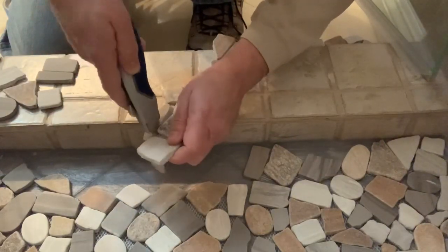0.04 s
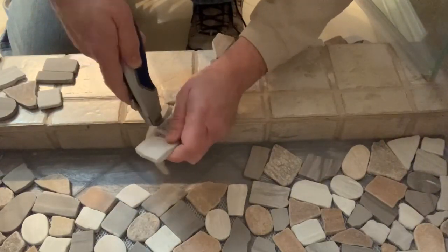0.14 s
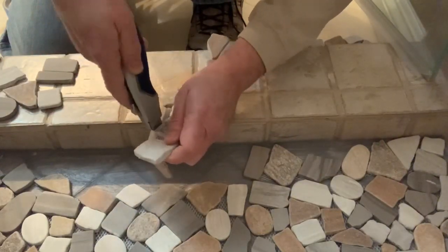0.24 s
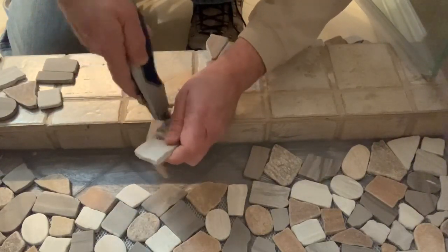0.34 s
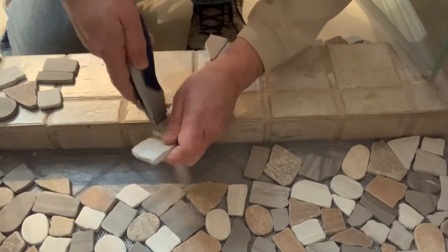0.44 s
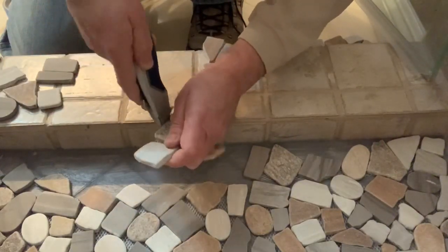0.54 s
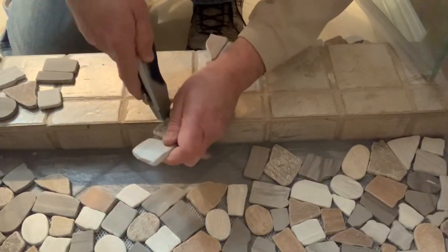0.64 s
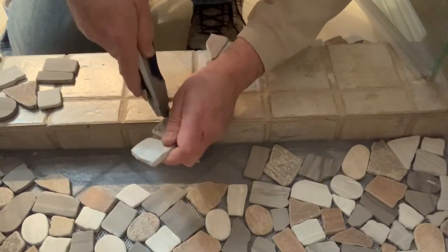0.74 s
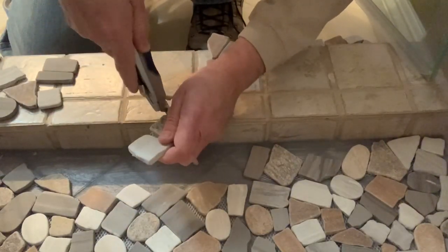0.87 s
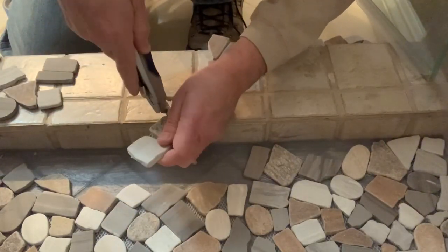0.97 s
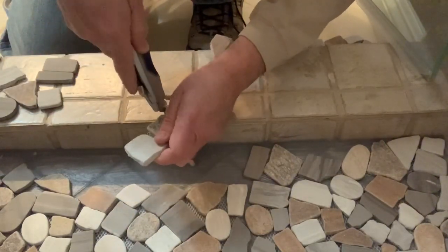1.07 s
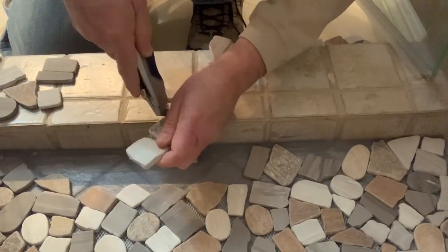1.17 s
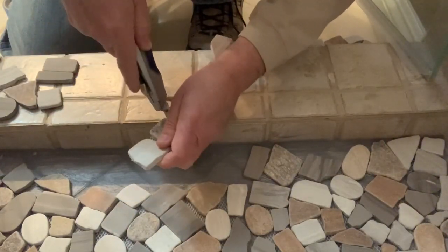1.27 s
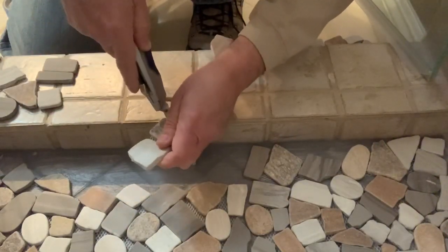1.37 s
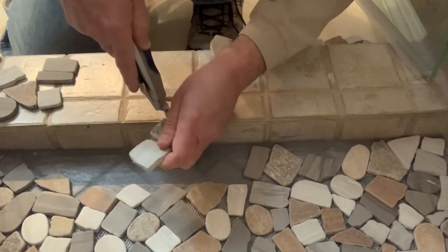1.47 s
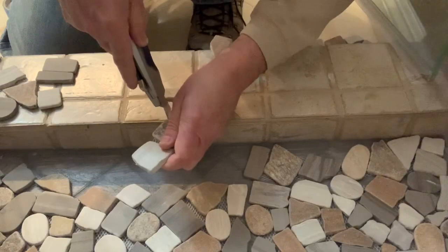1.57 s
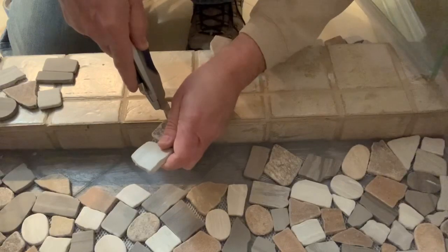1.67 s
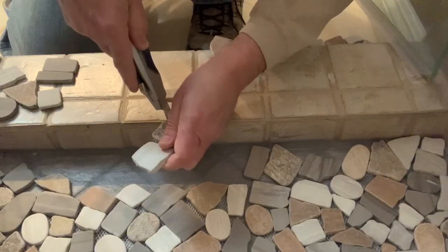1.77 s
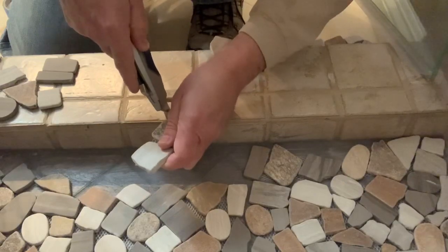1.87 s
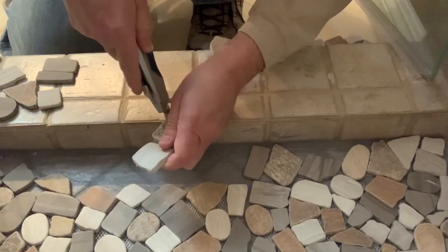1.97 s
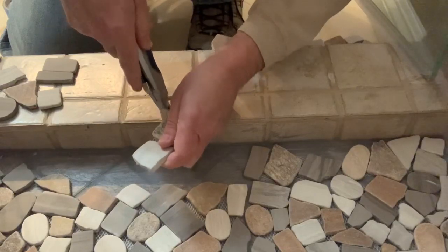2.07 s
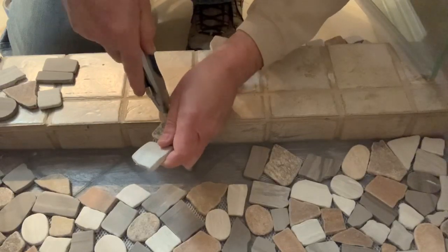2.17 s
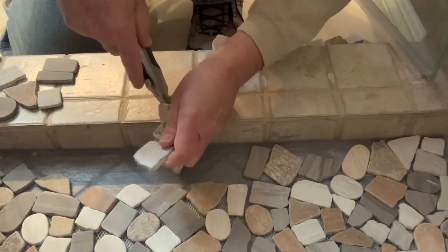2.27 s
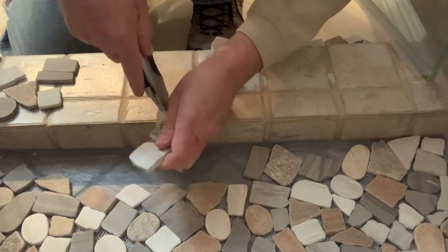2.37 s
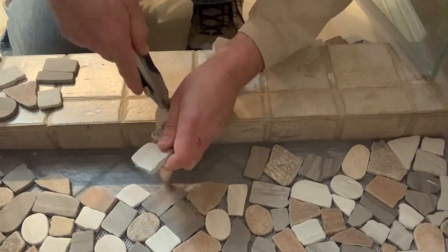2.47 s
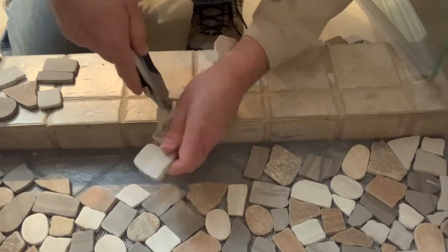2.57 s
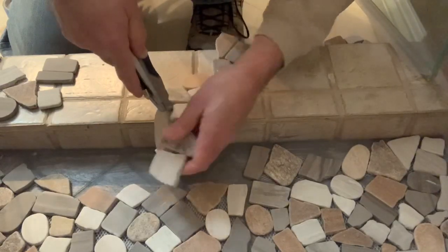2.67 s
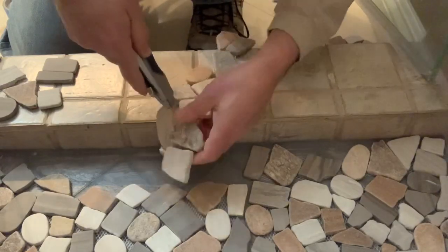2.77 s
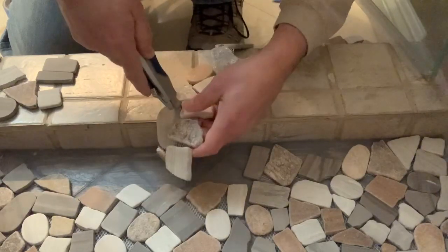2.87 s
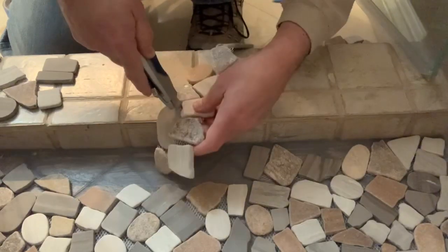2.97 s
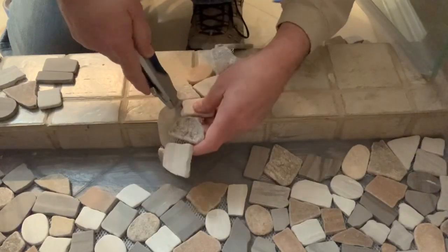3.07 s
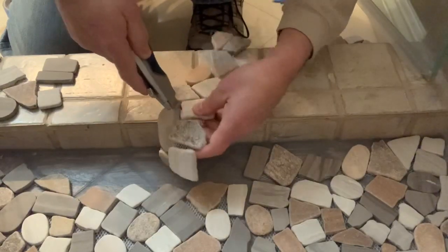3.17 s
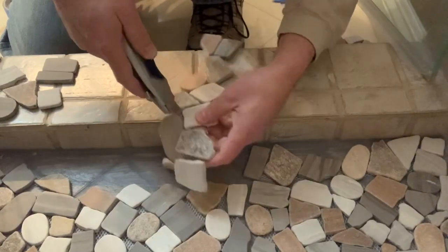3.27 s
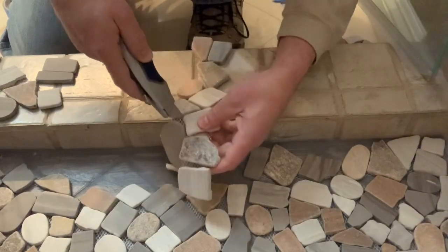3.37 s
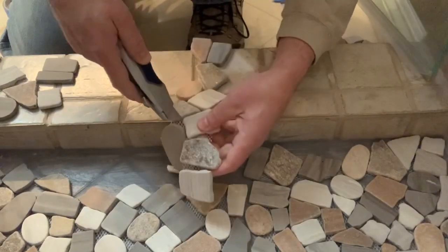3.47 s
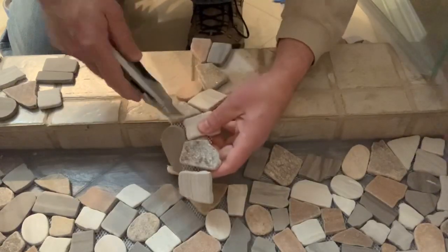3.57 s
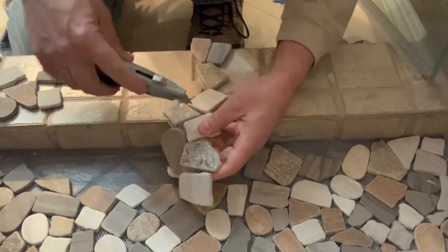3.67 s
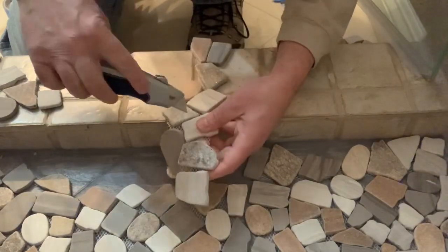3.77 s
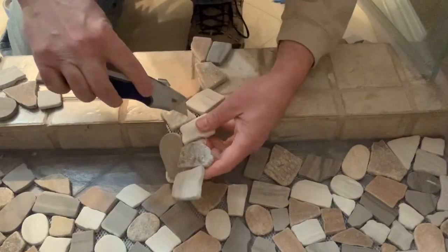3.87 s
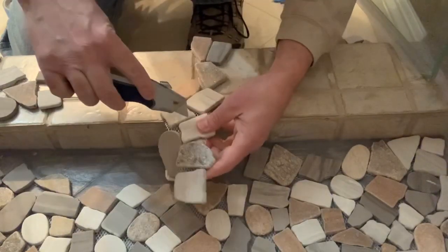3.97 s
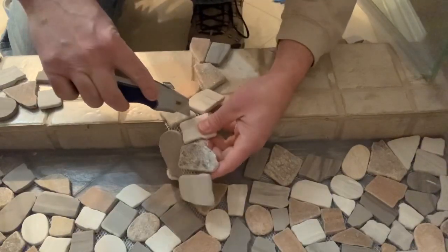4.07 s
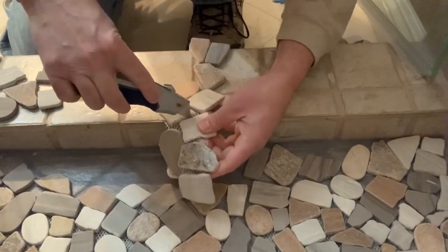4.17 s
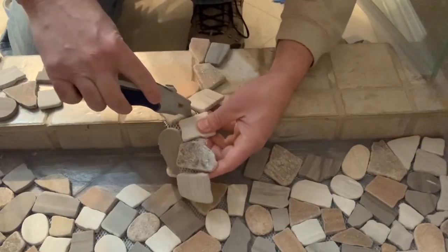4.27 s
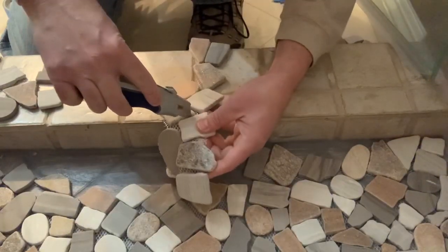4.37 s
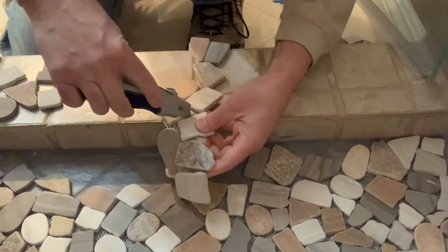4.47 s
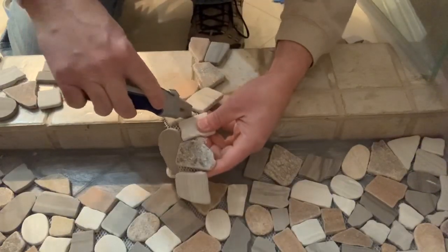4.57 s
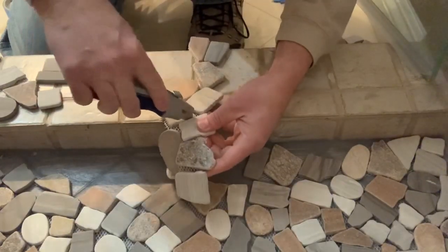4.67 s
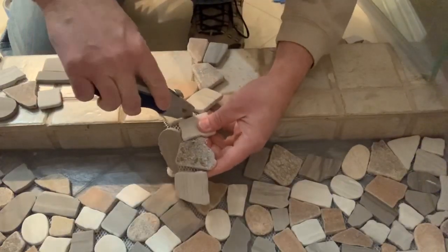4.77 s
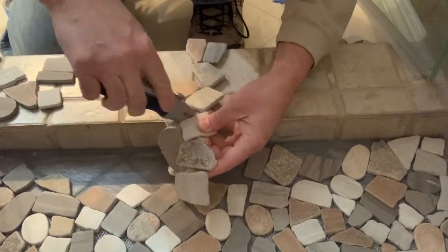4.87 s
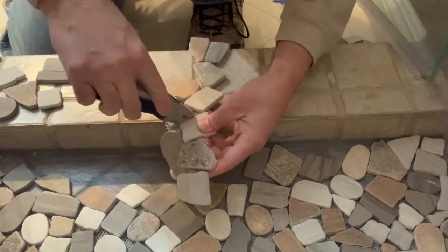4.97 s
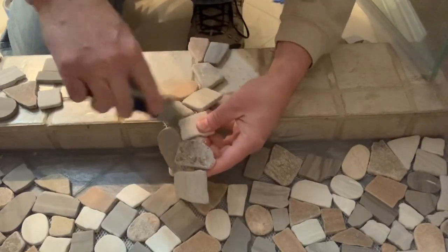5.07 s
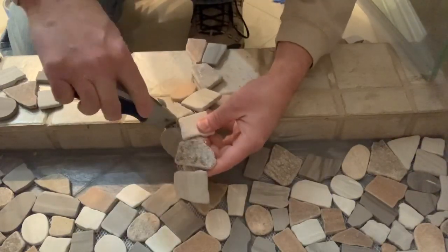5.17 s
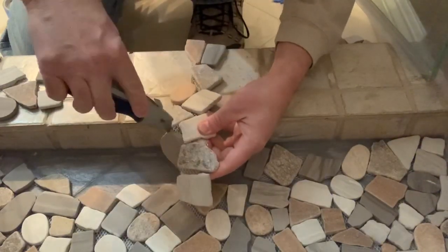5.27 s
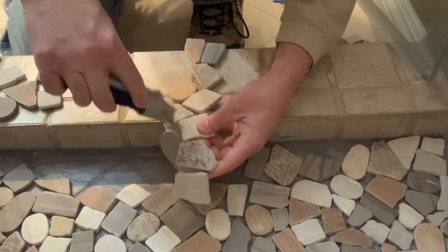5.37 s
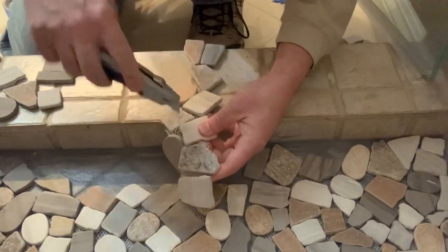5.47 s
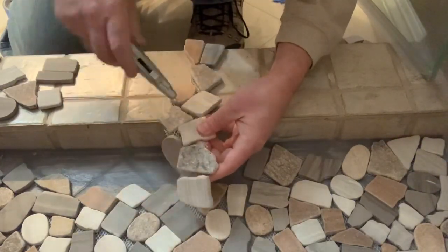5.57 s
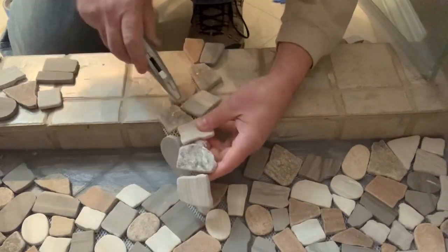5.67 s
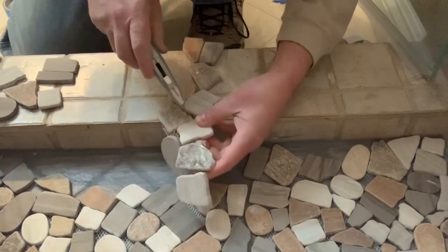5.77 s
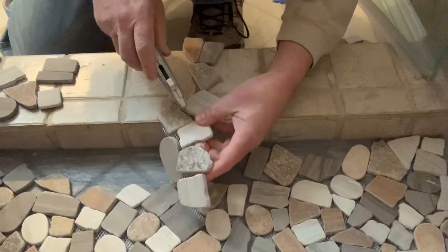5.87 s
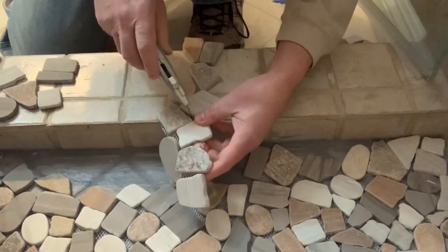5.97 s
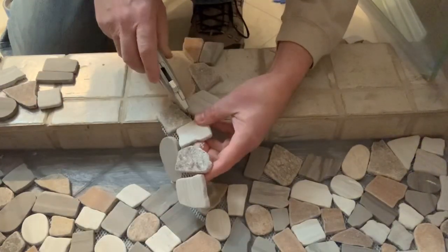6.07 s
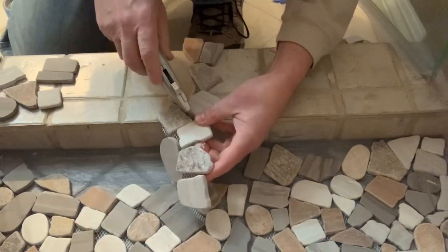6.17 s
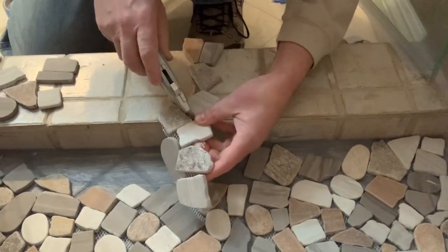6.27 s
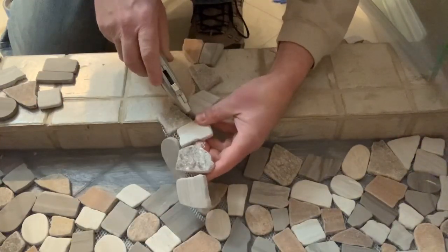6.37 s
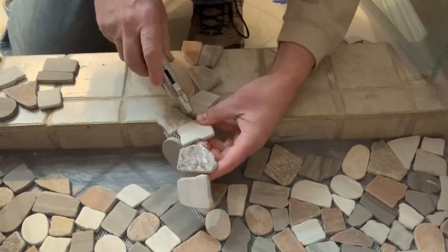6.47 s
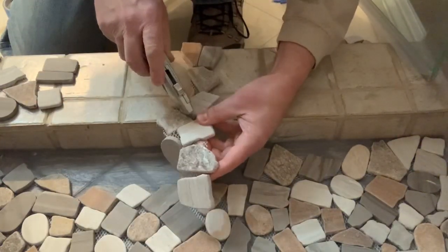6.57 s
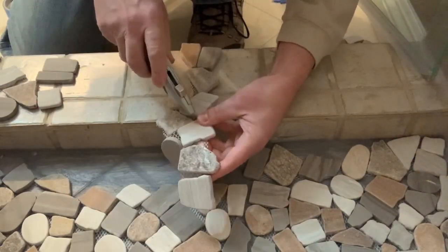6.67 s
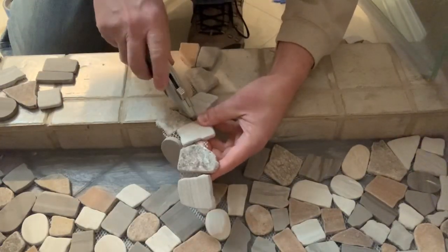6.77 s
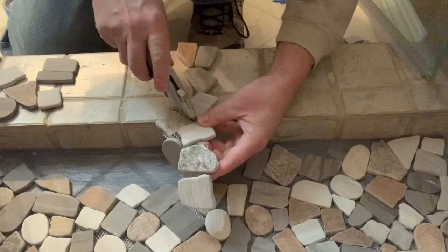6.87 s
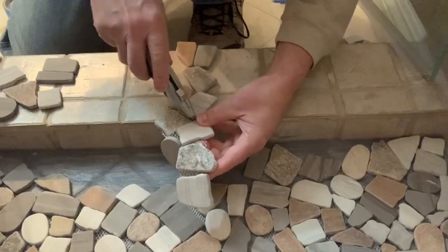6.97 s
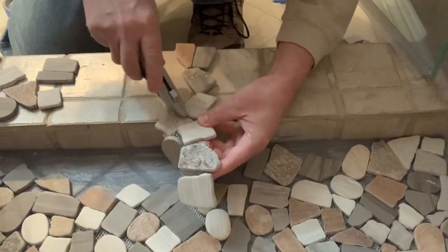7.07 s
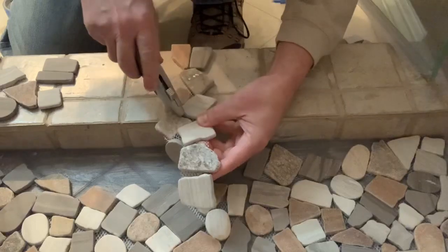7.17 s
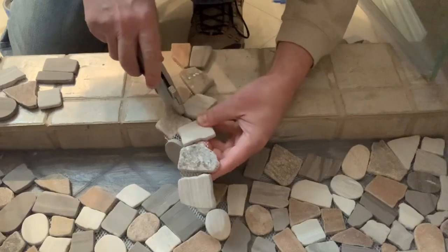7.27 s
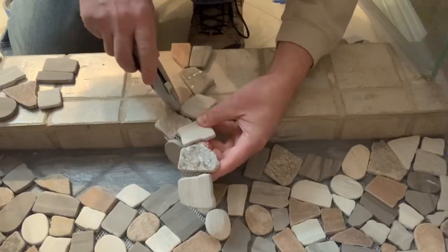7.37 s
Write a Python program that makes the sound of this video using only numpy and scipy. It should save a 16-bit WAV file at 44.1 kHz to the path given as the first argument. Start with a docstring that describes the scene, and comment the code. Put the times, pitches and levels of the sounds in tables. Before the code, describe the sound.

Sharp, irregular snaps and light stone clinks come as a sheet of small tiles is cut apart in an echoing bathroom.

```python
"""Cutting stone tiles in a bathroom

A hand blade snaps the mesh and glue between small stone tiles. Each snap is a short burst of
tiny cracks that makes a stone ring. Loose stones clink and rub, a sleeve rustles, and the sheet
of tiles thuds on a ledge. The hard, tiled room rings on, and the house drones low underneath."""
import sys
import numpy as np
from scipy import signal
from scipy.fft import rfft, irfft, next_fast_len
from scipy.io import wavfile
from scipy.ndimage import uniform_filter1d

SR = 44100
rng = np.random.default_rng(int(sys.argv[2]) if len(sys.argv) > 2 else 0)


def unload_audio(sound):
    """Save the sound as a 16-bit wav file, at the path given as the first command line argument."""
    columns = np.transpose(np.atleast_2d(sound))
    # keep every value between -1 and 1, then stretch to whole-number steps
    steps = np.round(np.clip(columns, -1, 1) * 32767)
    wavfile.write(sys.argv[1], SR, steps.astype(np.int16))


N = 327663

# Room resonances that hold the house's drone. Each row: pitch in Hz, width in Hz, level in dB.
DRONE_NOTES = [(66, 8.4, -61), (97.85, 7.6, -62)]
# The tone of the faint air noise. Each row: frequency in Hz, level in dB.
AIR_TONE = [(76, -30), (130, -3.5), (183, -4.5), (554, -19), (1140, -18.5), (11800, -28), (16000, -44)]
# Mesh and glue snapping. Each row: time in seconds, level in dB, the stone's pitch in Hz,
# treble in dB, body (the lower tones) in dB, build-up in milliseconds.
SNAPS = [(0.0076, -24, 3904, -5, -8, 5.2), (0.0238, -22.5, 4650, -4, 8.5, 8.4),
         (0.0573, -22, 2870, -6, -8, 11), (0.205, -37, 3170, -5, 14, 2.8),
         (0.2766, -25.5, 4320, 2, -8, 1.5), (0.291, -20, 4530, -2, 7, 3), (0.3018, -13.5, 4700, -4, 0, 2.5),
         (0.309, -13, 4510, -2.5, 0.5, 3.9), (0.3632, -30.5, 3030, 5.5, -0.5, 1.5),
         (0.372, -18.5, 11900, 2.5, 0, 1.2), (0.405, -19.5, 1100, -28.5, 17.5, 1.5),
         (0.476, -11.5, 1094, 1, 4.5, 1.6), (0.51, -24, 3910, -1, -5.5, 18),
         (0.5293, -22.5, 3770, -1, -20.5, 13), (0.643, -33.5, 4230, -1.5, -8, 5.4),
         (0.771, -44.5, 4410, -6, -2, 10.4), (1.049, -34.5, 930, 2.5, 10, 2),
         (1.0637, -31, 2470, -18, -5.5, 4.6), (1.166, -40, 2360, -9, -7, 19),
         (1.19, -38.5, 3860, 2, 2, 2.2), (1.4796, -31.5, 2310, -4, 11, 6.8),
         (1.603, -23.5, 3680, -3, 3, 0.16), (1.745, -45, 3700, 1.5, 24.5, 5.9),
         (1.8355, -40, 4150, -20, 4, 6.5), (1.9559, -26.5, 4400, -4, -7, 6.6),
         (1.9914, -28.5, 4980, -9.5, 3, 13.5), (2.0905, -37, 1370, 12.5, 42.5, 2.4),
         (2.153, -28, 3170, -3.5, 4, 3.5), (2.1896, -20, 5400, -1, -4, 16),
         (2.2751, -25.5, 2170, -3.5, 7, 2.2), (2.2876, -26, 2940, -2, 11.5, 1.1),
         (2.339, -29, 3060, -8.5, 16.5, 3.4), (2.5208, -34.5, 1780, -13, 14, 0.85),
         (2.564, -35, 4150, 5, 13, 1.9), (2.5955, -23.5, 5260, 1.5, 6.5, 3.2),
         (2.693, -34.5, 1050, -8, 9, 3.7), (2.738, -29, 2100, -13, 7.5, 2.7),
         (2.8723, -45.5, 2310, -2, 17, 1), (3.0255, -48.5, 2140, -5, 16, 3.7),
         (3.051, -30, 4780, -2, 12, 1.9), (3.269, -52, 1130, -4, 37, 7.5),
         (3.801, -55.5, 1340, -20, 53, 2.1), (4.0752, -43, 1445, -5.5, 2.5, 2.4),
         (4.1408, -41.5, 2270, -5.5, 1, 8.8), (4.2189, -27, 1300, -2, 1.5, 1.3),
         (4.5685, -38.5, 2230, -3, 9, 3.7), (4.813, -24, 4670, -3, 11, 1.03),
         (4.8225, -14.5, 2900, -11, -1.5, 2), (4.8259, -4, 3520, 1.5, 4.5, 2.2),
         (4.8501, -22.5, 4560, -17, 2, 4.6), (4.9144, -19.5, 13200, 7.5, 2, 0.3),
         (4.9215, -25, 1480, -7, -0.5, 2.5), (5.040, -15, 1100, -3.5, 0, 6), (5.0512, -12, 2940, 0, 2, 4),
         (5.0847, -20.5, 10600, 3, 12.5, 1.6), (5.2226, -30, 2510, -9.5, 7.5, 2.67),
         (5.2931, -35, 1484, -10, 14, 3.1), (5.3392, -34.5, 2680, -0.5, 15.5, 4.7),
         (5.7676, -32, 3950, 1, 10.5, 3.8), (5.864, -38, 3520, 13, 19.5, 3), (5.876, -43, 3400, -2, 0, 5),
         (6.031, -47.5, 4000, -10, 5, 2.9), (6.055, -44, 4200, -6, -1.5, 7),
         (6.179, -51.5, 3030, -14, 8, 1.53), (6.319, -45, 4170, -16, 5.5, 1.9),
         (6.553, -50, 2520, 2.5, -6, 0.7), (6.607, -46.5, 2820, -5, 10, 0.96),
         (6.684, -26, 5510, 3.5, 13.5, 2.05), (6.964, -27.5, 2970, -7.5, -16, 5.7),
         (6.9911, -9, 2950, -3, 3.5, 4.8), (7.0077, -7, 2890, -3, 6, 4.4),
         (7.056, -24.5, 4600, -4.5, 3.5, 8.9), (7.299, -34, 2800, 1.5, 11, 7.8),
         (7.309, -19.5, 3150, -7.5, -5, 2.6)]
# The tone of the cracking. Each row: frequency in Hz, level in dB.
CRACK_TONE = [(180, -72.5), (300, -39.5), (750, -18), (1020, -12), (1430, -15), (2210, -4.5), (2400, -8.5),
              (2700, -6.5), (4590, -6), (8090, -5), (12700, -7), (16000, -23.5)]
# The notes the sheet of tiles rings with. Each row: pitch in Hz, width in Hz, level in dB.
SHEET_NOTES = [(1150, 90, -9), (2200, 110, 1), (2950, 160, 0), (3750, 130, -3), (4600, 170, -2)]
# One stone knocking on another. Each row: start in seconds, level in dB, pitch in Hz.
CLINKS = [(0.303, -13, 4450), (0.368, -19, 3120), (0.478, -21.5, 3720), (0.508, -21.5, 3750),
          (0.807, -45.5, 942), (0.948, -52, 1010), (1.742, -41, 2980), (1.881, -36, 3010),
          (2.093, -38.5, 1250), (2.111, -38, 1400), (2.187, -25.5, 3090), (2.273, -40, 1084),
          (2.29, -27.5, 2984), (2.303, -44, 2680), (2.338, -30, 3100), (2.342, -45, 1030),
          (2.523, -40, 1350), (2.741, -42, 1090), (3.27, -59, 1110), (3.404, -48, 4830),
          (3.41, -50.5, 2970), (3.521, -57, 2450), (3.6, -60, 2446), (4.075, -50, 1400),
          (4.11, -45.5, 2950), (4.219, -39, 1420), (4.222, -37, 3580), (4.341, -42.5, 1510),
          (4.569, -38.5, 2244), (4.824, -18, 4660), (4.826, -20, 1460), (4.842, -20.5, 4450),
          (4.918, -26, 3720), (5.052, -16, 2930), (5.292, -33.5, 2930), (5.303, -36, 2970),
          (5.322, -37.5, 3135), (5.34, -40, 3600), (5.868, -37.5, 3290), (5.873, -42, 4790),
          (6.036, -44.5, 4080), (6.041, -49.5, 1598), (7.005, -12, 2980), (7.009, -10, 4580),
          (7.018, -28, 2180)]
# The sheet being set down on the ledge. Each row: start in seconds, level in dB.
THUDS = [(0.307, -49), (1.987, -50.5), (2.088, -40.5), (2.298, -39), (2.521, -41), (2.759, -52.5),
         (3.076, -47.5), (3.271, -48.5), (4.821, -49.5), (4.865, -42.5), (5.062, -40), (5.781, -58),
         (7.001, -41)]
# The low notes of the ledge. Each row: pitch in Hz, level in dB, seconds to fade by 60 dB.
LEDGE_NOTES = [(232, -10, 0.14), (298, 1, 0.17), (360, -3, .09), (409, -5, 0.11), (694, -11, 0.12)]
# Loose stones scraping. Each row: strongest moment in seconds, grit level in dB,
# length in seconds, level of the ringing hollow under the sheet in dB.
SCRAPES = [(0.665, -54, 0.068, -79), (1.113, -57, 0.26, -85), (1.461, -58, 0.038, -82),
           (1.685, -101, 0.34, -57.5), (1.846, -69, 0.11, -55.5), (2.16, -51, 0.54, -71),
           (2.57, -63, 0.59, -81), (2.785, -59, 0.13, -86), (3.147, -63, 0.23, -68.5),
           (3.284, -49, 0.17, -56), (3.41, -60, 0.098, -75), (3.608, -78.5, 0.62, -69),
           (4.298, -87, 0.24, -69), (4.713, -67.5, 0.22, -93), (5.488, -61.5, 0.19, -79),
           (5.833, -58.5, 0.066, -78), (6.632, -67.5, 0.35, -96)]
# The tone of stone on stone. Each row: frequency in Hz, level in dB.
GRIT_TONE = [(150, -21), (400, -11), (1500, -9), (4000, -18), (7000, -24.5)]
# Sleeve and mesh rustling. Each row: strongest moment in seconds, level in dB, length in seconds.
RUSTLES = [(0.75, -63, 0.1), (1.68, -65.5, 0.64), (1.93, -66, 0.19), (2.66, -61, 0.36), (3.12, -59, 0.063),
           (3.56, -66, 0.39), (3.76, -68.5, 0.096), (5.47, -72, 0.055), (5.62, -68, 0.21),
           (5.77, -60, 0.16), (6.07, -68, 0.13), (6.3, -71, 0.16)]
# The tone of the cloth. Each row: frequency in Hz, level in dB.
CLOTH_TONE = [(1500, -19.5), (4000, -12.5), (7300, -9.5), (12000, -8.5), (14000, -8.5), (16000, -19.5)]
# How long the room rings. Each row: frequency in Hz, seconds to fade by 60 dB.
ROOM_FADE = [(250, 1), (700, 0.66), (1700, 0.53), (4600, 0.38), (12000, 0.23)]
# How alike left and right are made: bass centred, middle wide, highest treble narrowed toward
# the centre. Each row: frequency in Hz, likeness from 0 to 1.
LEFT_RIGHT_LIKENESS = [(100, 0.91), (600, 0.063), (6000, 0.033), (9500, 0.057), (11500, 0.66)]
# Resonances of the room's corner. Each row: pitch in Hz, width in Hz, gain in dB.
CORNER_NOTES = [(697, 34, 3.5), (1130, 60, -10)]
# How far the right microphone lags the left. Each row: frequency in Hz, lag in radians.
RIGHT_LAG = [(1200, 0), (2200, .9), (3200, -.9), (4100, .9), (5200, -.9), (8500, -2.6), (10800, 0),
             (12200, 0), (13500, 1.2), (14600, 3)]


def gain_of(db):
    """Turns decibels into a number to multiply by."""
    return 10 ** (np.asarray(db) / 20)


def evened(x):
    """Scales a sound so that its average strength (rms) is 1."""
    return x / np.sqrt(np.mean(x ** 2) + 1e-20)


def read(points, hz):
    """Looks up a value between a table's rows, on a log-frequency scale."""
    f, value = np.transpose(points)
    return np.interp(np.log(hz + 1), np.log(f + 1), value)


def add(mix, start_s, sound):
    """Mixes a sound in at the given time."""
    at = round(start_s * SR)
    sound = sound[max(-at, 0):]
    part = mix[max(at, 0):][:len(sound)]
    part += sound[:len(part)]


def colour(x, response):
    """Filters a sound: each frequency is multiplied by response(frequency)."""
    size = next_fast_len(x.shape[-1])
    hz = np.fft.rfftfreq(size, 1 / SR)
    return irfft(rfft(x, size) * response(hz), size)[..., :x.shape[-1]]


def resonate(x, hz, width):
    """Lets a sound ring at one pitch; a smaller width in Hz rings longer."""
    r = np.exp(-np.pi * width / SR)
    return 2 * signal.lfilter([1 - r], [1, -r * np.exp(2j * np.pi * hz / SR)], x).real


def band(x, hz, width, second_width):
    """Keeps a narrow band around one pitch by ringing it twice; strength 1."""
    return evened(resonate(resonate(x, hz, width), hz, second_width))


def crackle(count, spread_db):
    """Dense clicks; a bigger spread makes their sizes more uneven."""
    return rng.standard_normal(count) * gain_of(spread_db * rng.standard_normal(count))


def flutter(count, depth_db, smooth_samples):
    """A gain that wanders up and down at random."""
    return gain_of(depth_db * evened(uniform_filter1d(rng.standard_normal(count), smooth_samples)))


def house_drone():
    """The house drones in two low room resonances, with faint air noise and rumble."""
    air = evened(colour(rng.standard_normal((2, N)), lambda f: gain_of(read(AIR_TONE, f))))
    drone = sum(gain_of(db) * band(rng.standard_normal(N), hz, width, 1.2 * width)
                for hz, width, db in DRONE_NOTES)
    noise = rng.standard_normal((2, N))
    deep = band(noise + 1.6 * noise.sum(0), 60, 33, 33)  # nearly the same on both sides
    upper = band(rng.standard_normal((2, N)), 100, 36, 36)
    rumble = gain_of(-72.5) * deep + gain_of(-73.5) * upper
    return gain_of(-79) * air + drone * gain_of([[1.2], [-1.2]]) + rumble


def snap_shape(ms, db, rise_ms):
    """A snap's strength over time: it builds until the stone gives at 0 ms, then dies away."""
    after = np.maximum(ms, 0)
    build_up = np.clip(1 + ms / (3.2 * max(rise_ms, .1)), 0, 1) ** 2.74
    fall_ms = max(3.2 - 0.1038 * db + 0.013 * rise_ms, .3)  # soft or slow snaps linger longer
    settling = np.exp(-after / fall_ms) + gain_of(-39.5) * np.exp(-after / 35)
    first_crack = gain_of(-4.5 + 0.42 * db) * np.exp(-after / 0.12)
    drops = (rng.random(len(ms)) < 160 / SR) * rng.exponential(1, len(ms))  # bits of glue and stone
    crumbs = gain_of(-17) * signal.lfilter([1], [1, -.97], drops) * np.exp(-after / 45)
    return np.where(ms < 0, build_up, settling + first_crack + crumbs)


def snap(ms, db, hz, treble_db, body_db, rise_ms):
    """Fibres give way in fits, and the burst of cracks rings one stone and the whole sheet."""
    shape = snap_shape(ms, db, rise_ms)
    fits = flutter(len(ms), depth_db=4.5, smooth_samples=60)
    burst = crackle(len(ms), spread_db=0) * shape * fits
    tilt = [(500, 0.23 * body_db), (800, 1.1 * body_db - 4), (1000, body_db), (1400, body_db),
            (2200, 0.0082), (5500, 0.002), (8000, treble_db)]
    crack = colour(burst, lambda f: gain_of(read(CRACK_TONE, f) + read(tilt, f)))
    push = colour(burst, lambda f: 1 / (1 + (950 / (f + 1)) ** 6))  # small stones carry no bass
    stone = resonate(push, hz, .13 * hz)
    stone_db = -12 + .15 * body_db - 0.0603 * db  # full-bodied and soft snaps ring the stone more
    sheet = 0
    for note_hz, width, note_db in SHEET_NOTES:
        level = gain_of(note_db + 4.5 * rng.standard_normal())
        pitch = note_hz * (1 + .05 * rng.standard_normal())  # varies with the grip and the stone
        sheet += level * resonate(push, pitch, width)
    sound = evened(crack) + gain_of(-9.5) * evened(sheet) + gain_of(stone_db) * evened(stone)
    return gain_of(db) * sound * np.sqrt(np.mean(shape ** 2)) / 3


def snaps():
    """The blade breaks mesh and glue; each snap starts early to leave time for its build-up."""
    out, lead_s = np.zeros(N), .04
    ms = 1000 * (np.arange(6144) / SR - lead_s)
    for time_s, *settings in SNAPS:
        add(out, time_s - lead_s, snap(ms, *settings))
    return out


def clink(hz):
    """A short gritty touch and one bounce ring two close notes of a stone."""
    t, touch_s = np.arange(2048) / SR, .002
    gap, spacing, softness = rng.random(3)
    bounce_s = .006 + .01 * gap
    bounce = gain_of(-7 - 9 * softness) * (t > bounce_s) * np.exp(-abs(t - bounce_s) / touch_s)
    push = rng.standard_normal(len(t)) * (np.exp(-t / touch_s) + bounce)
    width = 2.2 * hz / 50  # fades by 60 dB in 50 vibrations
    notes = resonate(push, hz, width) + 0.3 * resonate(push, hz * (1.1 + .2 * spacing), width)
    ring = resonate(notes, 1.05 * hz, .4 * hz)
    return ring / abs(ring).max()


def clinks():
    """Stones knock together, and five chips scatter after every snap, the later ones softer."""
    out = np.zeros(N)
    for start_s, db, hz in CLINKS:
        add(out, start_s, gain_of(db) * clink(hz))
    for snap_s, db, *_ in SNAPS:
        for wait, smallness, pitch in rng.random((5, 3)):
            late_s = -.03 * np.log(1 - wait)  # 30 ms on average
            chip_db = db - 15 - 12 * smallness - 150 * late_s
            add(out, snap_s + late_s, gain_of(chip_db) * clink(1100 * 5 ** pitch))
    return out


def thuds():
    """The sheet lands softly: a dull puff, and the ledge rings with its low notes."""
    t, out = np.arange(SR // 3) / SR, np.zeros(N)
    fade_in = 1 - np.exp(-t / 0.0018)
    for start_s, db in THUDS:
        ring = 0
        for hz, note_db, fade_s in LEDGE_NOTES:
            level = gain_of(note_db + 2 * rng.standard_normal() - 60 * t / fade_s)
            ring += level * np.sin(2 * np.pi * hz * t)
        puff = evened(resonate(rng.standard_normal(len(t)), 380, 400)) * gain_of(-4 - 60 * t / 0.04)
        add(out, start_s, gain_of(db) * (ring + puff) / 2 * fade_in)
    return out


def strokes(rows, rest_db):
    """Rubbing swells and fades with each stroke; in between, the hands are never quite still."""
    t, end_drop_db = np.arange(N) / SR, 21.5
    swells = sum(gain_of(db - end_drop_db * abs(t - middle_s) / (length_s / 2))
                 for middle_s, db, length_s in rows)
    return gain_of(rest_db) + swells


def scrapes():
    """Stones rub in clumps of tiny clicks, ringing the sheet and the hollow under it."""
    grains = crackle(N, spread_db=5.5) * flutter(N, depth_db=3.7, smooth_samples=500)
    slips = rng.random(N) < 30 / SR  # a stone slips about 30 times a second
    grains *= 1 + 1.3 * signal.oaconvolve(slips, np.exp(-np.arange(600) / 90))[:N]
    friction = evened(colour(grains, lambda f: gain_of(read(GRIT_TONE, f))))
    sheet = evened(sum(gain_of(db) * resonate(grains, hz, width) for hz, width, db in SHEET_NOTES))
    grit = evened(friction + gain_of(-12.5) * sheet)
    hollow = band(grains, 1090, 135, 260)
    middle_s, grit_db, length_s, hollow_db = np.transpose(SCRAPES)
    grit_level = strokes(zip(middle_s, grit_db, length_s), rest_db=-81.5)
    hollow_level = strokes(zip(middle_s, hollow_db, length_s), rest_db=-105)
    return grit_level * grit + hollow_level * hollow


def rustles():
    """Sleeve and mesh brush along with a fine, bright crackle."""
    cloth = evened(colour(crackle(N, spread_db=6.5), lambda f: gain_of(read(CLOTH_TONE, f))))
    return strokes(RUSTLES, rest_db=-89) * cloth


def echo_tail():
    """The room's answer to one click: many reflections, with the high tones dying first."""
    taps = np.zeros((2, SR))
    at = np.arange(40, SR - 20, 20) + rng.integers(0, 20, (2, (SR - 41) // 20))
    np.put_along_axis(taps, at, rng.choice([-1., 1.], at.shape), 1)
    taps *= 1 + 0.5 * np.exp(-np.arange(SR) / SR / 0.018)  # the near floor and ledge answer strongest
    hz, t, bands = signal.stft(taps, SR, nperseg=256)
    alike = read(LEFT_RIGHT_LIKENESS, hz)[:, None]
    bands[1] = alike * bands[0] + np.sqrt(1 - alike ** 2) * bands[1]
    fade = gain_of(-60 * t / read(ROOM_FADE, hz)[:, None])
    tail = signal.istft(bands * fade, SR, nperseg=256)[1]
    return tail / np.linalg.norm(tail[0])


def room(x):
    """The hard room rings on: three echo tails take turns, and the corner adds its own notes."""
    out = np.zeros((2, N))
    turn = 2 * np.pi * 3.1 * np.arange(N) / SR
    for k in range(3):
        feed = x * np.cos(turn + k * 2 * np.pi / 3) * np.sqrt(2 / 3)
        out += signal.fftconvolve(feed[None], echo_tail(), axes=1)[:, :N]
    return out + sum(gain_of(db) * resonate(out, hz, width) for hz, width, db in CORNER_NOTES)


def scene():
    """The work on the tiles, heard directly and through the room, over the drone of the house."""
    cutting = snaps() + scrapes() + rustles()
    clinking, thudding = clinks(), thuds()
    echo = room(cutting + gain_of(-2) * thudding + gain_of(-9) * clinking)  # clinks stir the room less
    heard = (cutting + clinking) * gain_of([[-.4], [.4]]) + gain_of(0.3) * echo
    heard[1] = colour(heard[1], lambda f: np.exp(-1j * read(RIGHT_LAG, f)))
    return heard + thudding * gain_of([[1.2], [-1.2]]) + house_drone()


def record(dry):
    """A noise suppressor turns quiet moments down; the microphone softens peaks and trims the tone."""
    activity = colour(dry.mean(0), lambda f: f > 300)
    power_db = 10 * np.log10(abs(uniform_filter1d(activity ** 2, size=600)) + 1e-12)
    fall_db = 144 * np.arange(N) / SR
    held_db = np.maximum.accumulate(power_db + fall_db) - fall_db  # jumps up, sinks 144 dB a second
    cut_db = uniform_filter1d(np.clip(0.48 * (-61 - held_db), 0, 9), size=300)
    slow_db = uniform_filter1d(power_db, size=9000)  # the bass follows the scene more slowly
    bass_cut_db = np.clip(0.33 * (-48 - slow_db), 0, 8)
    bass = colour(dry, lambda f: 1 / (1 + (f / 150) ** 8))
    sound = (dry - bass) / gain_of(cut_db) + bass / gain_of(bass_cut_db)
    sound = signal.lfilter(*signal.butter(2, 30, "high", fs=SR), sound)  # drops the deepest bass
    sound = .9 * np.tanh(sound / .9)  # the loudest snaps overload softly
    treble_limit = signal.firwin(511, 16300, window=("kaiser", 9), fs=SR)
    return signal.oaconvolve(sound, treble_limit[None], "same")


dry = scene()
out = record(dry)
unload_audio(out)
```